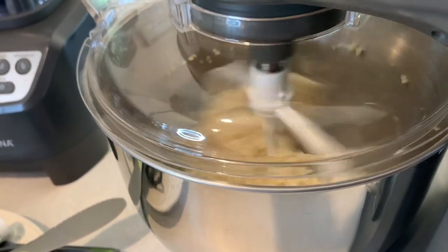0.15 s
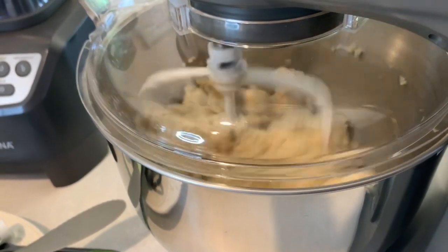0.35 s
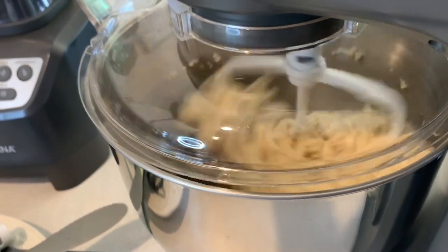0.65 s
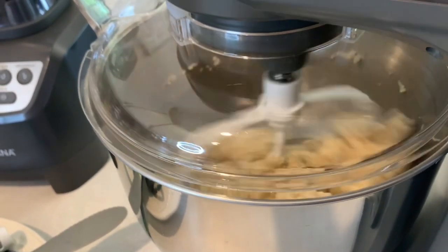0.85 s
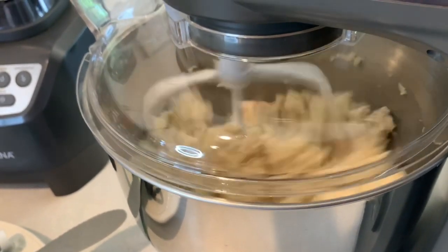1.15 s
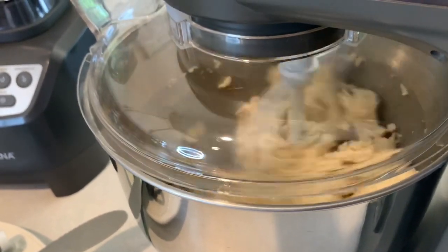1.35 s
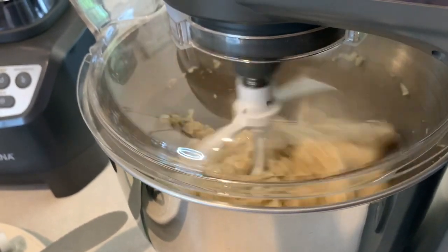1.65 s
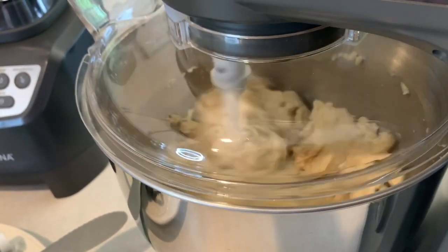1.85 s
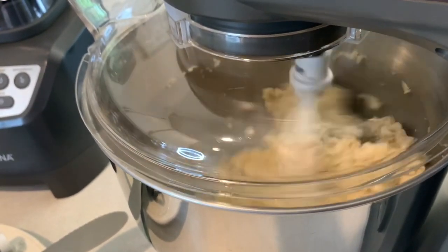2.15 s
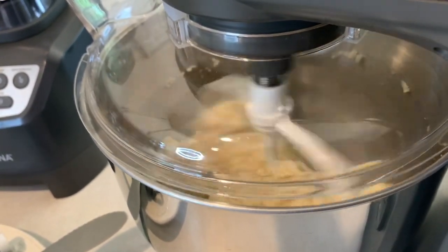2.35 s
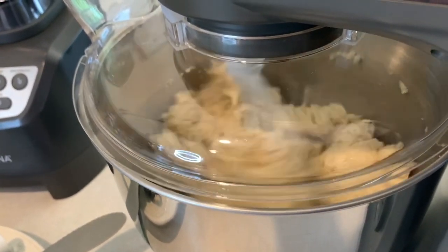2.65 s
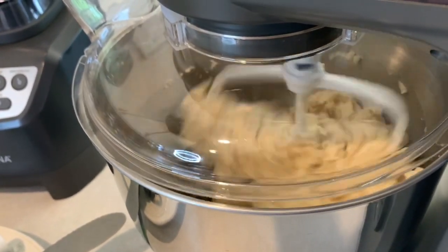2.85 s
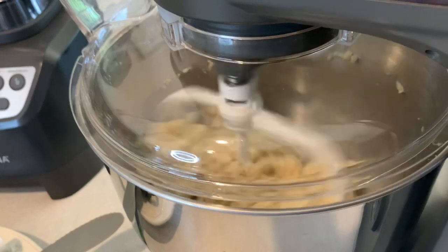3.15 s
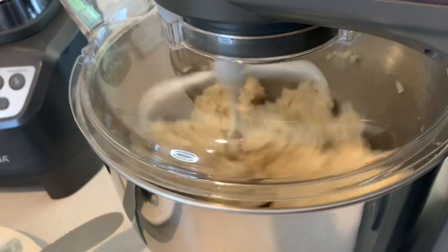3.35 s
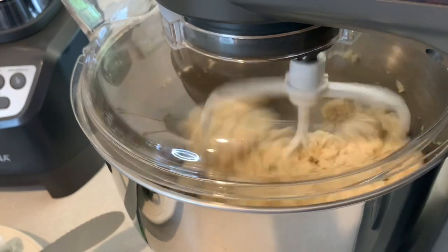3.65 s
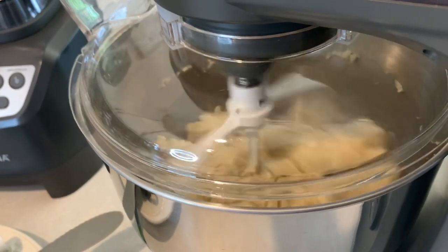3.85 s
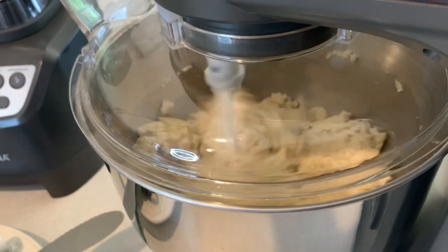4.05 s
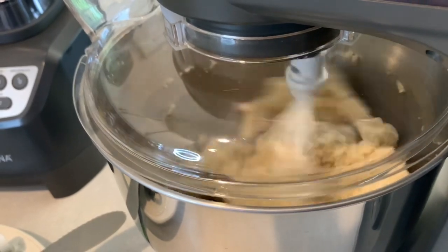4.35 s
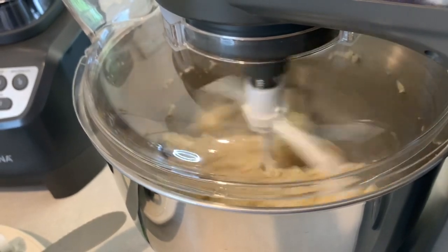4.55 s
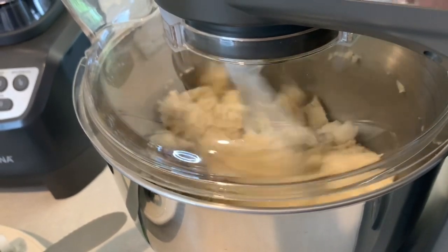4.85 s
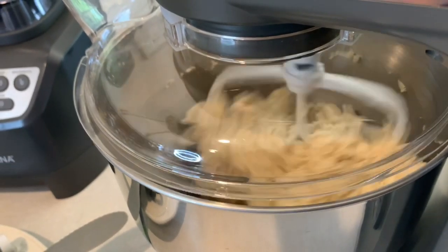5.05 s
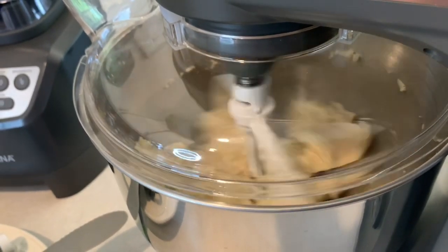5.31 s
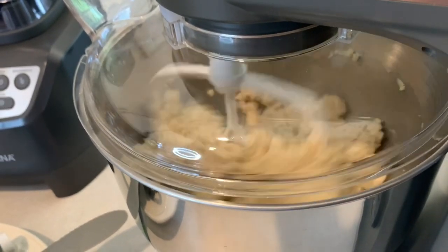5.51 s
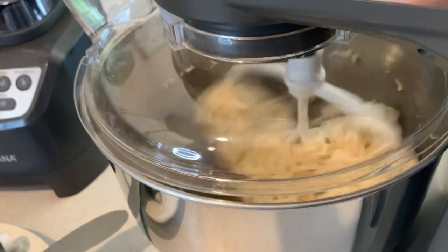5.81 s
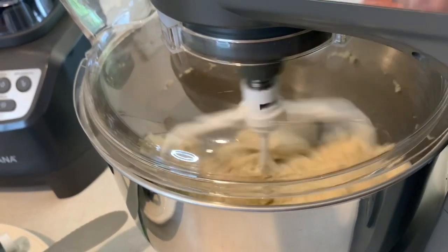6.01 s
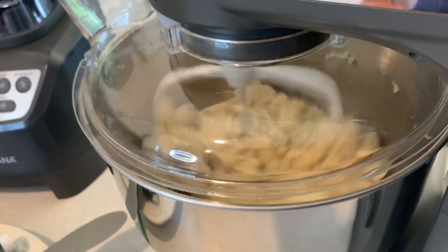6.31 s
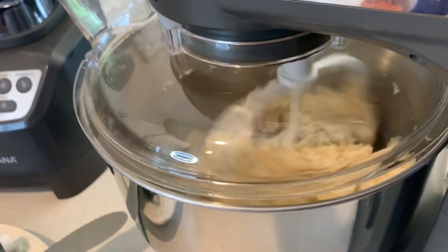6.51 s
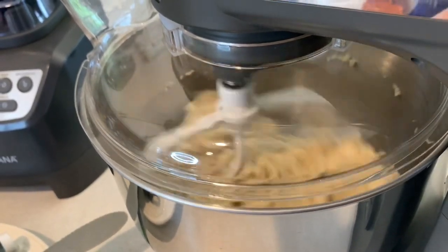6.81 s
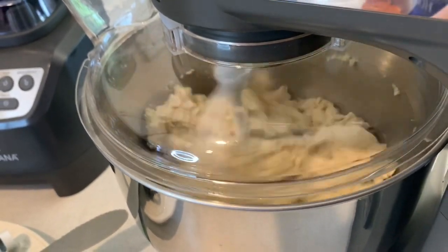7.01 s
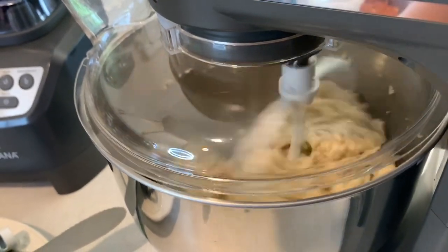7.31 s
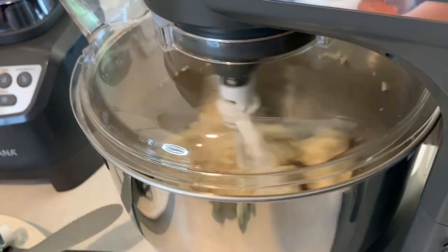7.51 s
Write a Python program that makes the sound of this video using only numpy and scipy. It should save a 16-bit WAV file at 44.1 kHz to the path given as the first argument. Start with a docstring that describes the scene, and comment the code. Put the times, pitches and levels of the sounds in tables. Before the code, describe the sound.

Very close to the microphone, a kitchen stand mixer whirs without a break, mixing a low electric hum, a buzzing rattle and a rhythmically pulsing whine. The gears add a fast, piercing tick and scrape that slightly overloads at the peaks. Dough rumbles and thumps softly against the steel bowl, growing quieter in the second half as it binds, and near the end a nasal gear tone grows stronger.

```python
"""A stand mixer kneading dough

Dough tumbles in a steel bowl, very close to a phone with two microphone ports. The motor hums and
the housing rattles. The gears whine, swelling as the beater circles and sagging as the dough drags.
Rough teeth on the pinion (the small driving gear) tick shrilly in the same pattern on every turn,
and the loudest peaks overload the phone."""
import sys
import numpy as np
from scipy import signal
from scipy.fft import rfft, irfft
from scipy.io import wavfile
from scipy.ndimage import uniform_filter1d

SR = 44100
rng = np.random.default_rng(int(sys.argv[2]) if len(sys.argv) > 2 else 0)


def output_pcm(signal):
    """Save a mono or channel-first signal as 16-bit PCM at the path in sys.argv[1].

    Samples are clipped to [-1, 1] before scaling.
    """
    pcm = np.clip(np.atleast_2d(signal).T, -1, 1) * 32767
    wavfile.write(sys.argv[1], SR, np.round(pcm).astype(np.int16))


N = 338247
T = np.arange(N) / SR
HZ = np.maximum(np.arange(N // 2 + 1) * SR / N, 1)

MAINS_HZ = 60
WHINE_ORDER, SECOND_GEAR_ORDER = 28, 44  # vibrations per turn of the shaft
ORBIT_HZ, BLADE_HZ = 1.361, 6.366  # the beater's trips round the bowl, and its blade strokes

# How the two ports hear a sound. Each row: frequency in Hz, left's lead in radians, likeness (0-1).
MIC_PORTS = [(30, 0.5, 0.4), (100, -0.5, 0.44), (398, -.5, 1), (875, -1, 0.46), (1110, -2, 0.63),
             (1680, -2.5, 0.02), (2060, 0, 0.22), (4100, -1, 0.05), (6170, 1, 0.12), (7100, -1.5, 0.77),
             (7230, -0.9, 0.96), (7660, -2, 0.83), (8163, -2.5, 1), (8310, -3, 0.98), (9530, -3.5, 1),
             (9900, -5, 0.94), (11300, -5, 0.8), (12400, -10.5, 0.8), (14100, -16.5, 0), (15200, -10, 0.3)]
# The rumble of tumbling dough. Each row: frequency in Hz, base level in dB per Hz.
DOUGH_SPECTRUM = [(30, -77), (130, -56.5), (200, -56.5), (275, -52), (330, -61), (450, -68), (1500, -89)]
# Heavy lumps landing. Each row: time in seconds, base thud level in dB, change in the rumble in dB.
LUMPS = [(1.666, -30, -5), (1.87, -36, 4), (2.396, -27, -2), (3.475, -27, -2), (3.688, -26, 3),
         (3.792, -24, 4), (4.0, -27, 1), (5.001, -28, -6), (5.591, -24, 11), (5.741, -19, -3)]
# The motor's magnetic hum. Each row: multiple of the mains rate, level in dB,
# left minus right in dB, left's lead in radians.
HUM_TONES = [(1, -45, -3, .2), (2, -29.5, -3, .1), (4, -43, -4, -1.5), (6, -26.5, 0, -.4), (8, -33, 2, -.4),
             (10, -40.5, -2, -1.6), (12, -44, -5, .5), (14, -33.5, -3, .2), (16, -39, -4, -1.6)]
# Faint tones beside the hum. Each row: pitch in Hz, then level, balance and lead as for the hum.
FAINT_TONES = [(320, -38, -3, -.5), (492, -39, 1, -.7), (625, -42, -1, -2.5)]
# The rush of the motor and its cooling air. Each row: frequency in Hz, base level in dB per Hz.
RUSH_SPECTRUM = [(15, -69), (55, -56), (100, -58), (170, -59.5), (420, -59), (700, -56), (1250, -54.5),
                 (2350, -59), (3300, -56), (4500, -56.5), (5300, -60), (6300, -61), (8000, -68.5)]
# Where housing and bowl ring. Each row: pitch in Hz, width in Hz, boost in dB.
BODY_RESONANCES = [(339.5, 33, 11.5), (491, 53, 9), (867, 75, 7.5), (1010, 110, 7), (1322, 36, 5.5),
                   (1497, 89, 9), (1720, 330, 7.5), (2060, 194, 8), (3126, 150, 1), (3940, 110, 3.5),
                   (6070, 100, 11.5)]
# The drive's speed, heard as the pitch of its whine. Each row: time in seconds, pitch in Hz.
WHINE_PITCH = [(0.08, 1006), (0.31, 1010), (0.62, 1006), (1.27, 1020), (1.39, 1006), (1.67, 1007),
               (1.77, 1017), (2.11, 1007), (2.84, 1008), (3.44, 1007), (4.38, 1009), (4.61, 1017),
               (4.74, 1009), (5.53, 1013), (5.85, 1002), (6.14, 1011), (7.1, 1007), (7.58, 1011)]
# Tones of meshing gears. Each row: multiple of the shaft's rate, base level in dB,
# left minus right in dB, left's lead in radians.
GEAR_TONES = [(11 / 3, -26, -6.5, -0.13), (22 / 3, -42.5, 0, -0.61), (14, -32.5, -0.5, -0.3),
              (24, -35, -1, -0.2), (26, -35.5, 8, -2), (28, -19.5, -3.5, -2.5), (29.5, -31.5, 1.5, -1.5),
              (37.5, -42, 8, 0), (42, -32.5, 10.5, -1.9), (46.5, -36, 4, 0), (143 / 3, -31.5, 0, -2.1),
              (55.5, -41, 2, 4.5), (172 / 3, -36.5, 0, .2), (70, -35.5, 4.5, 1), (82, -36, -3, 3),
              (88, -28.5, 4, -2), (120.5, -39, 9.5, -1), (150.5, -39, 0, -0.5), (253, -32.5, -0.5, 5)]
# How the gear tones swell as the beater circles, one table for each group of tones.
# Each row: swells per orbit, base depth in dB, place of the peak in the swell (0-1).
WHINE_SWELL = [(1, 0.6, 0.54), (2, 2.5, 0.46)]
LOW_GEAR_SWELL = [(1, 3.1, 0.42)]
UPPER_GEAR_SWELL = [(2, 0.85, .95)]
IN_STEP_SWELL = [(1, 3.2, .70)]
OPPOSITE_SWELL = [(1, 4, 0.29), (3, 1.6, 0.99)]
# The second gear sings out when the beater pushes a big lump.
# Each row: time in seconds, half length in seconds, boost in dB.
LUMP_SURGES = [(0.43, 0.073, 7), (1.22, .12, 5), (1.92, 0.064, 6), (4.25, .08, 5), (7.47, 0.14, 6.5)]
# The scrape of the gears. Each row: frequency in Hz, base level in dB per Hz.
SCRAPE_SPECTRUM = [(5000, -93), (5900, -57.5), (6500, -51.5), (6950, -49), (7100, -47.5), (7550, -41.5),
                   (8250, -37.5), (8700, -49), (9300, -70), (9750, -49), (10250, -63), (10700, -56),
                   (12000, -62.5), (13000, -65), (15500, -55)]
# Pitches the gear case favours or muffles. Each row: pitch in Hz, width in Hz, boost or cut in dB.
CASE_RESONANCES = [(7110, 63, 7), (7180, 44, -10.5), (7280, 99, 5.5), (7540, 270, 2.5), (7917, 333, -10),
                   (8160, 48, 6.5), (8490, 88, 5), (8230, 120, -3)]
# Rough spots on the pinion. Each row: place in the turn (0-1), half length in milliseconds,
# ringing pitch in Hz, base level in dB.
ROUGH_TEETH = [(.005, 0.61, 7380, -4.5), (.045, 0.68, 7870, -3), (.10, 0.56, 7190, -9.5),
               (.21, 0.81, 7200, -12.5), (.30, 0.56, 7520, -13.5), (.37, 0.79, 7914, 2),
               (.48, 1.5, 7710, -13.5), (.565, 0.67, 8110, -4), (.63, 0.32, 8400, -7.5),
               (.70, 0.25, 8330, -6.5), (0.774, 0.36, 8270, -1.5), (.845, 0.33, 8300, -8.5),
               (.90, 0.65, 7200, -8), (.955, 0.38, 7880, -0.5)]


def undb(db):
    """Turn decibels into a factor to multiply by."""
    return 10 ** (np.asarray(db) / 20)


def bump(offset, half_width):
    """A smooth hill of height 1, centred where the offset is zero."""
    return np.exp(-.5 * (offset / half_width) ** 2)


def colour(points):
    """Gain at every frequency, drawn through (Hz, dB) points."""
    hz, db = np.transpose(points)
    return undb(np.interp(np.log(HZ), np.log(hz), db))


def resonances(peaks):
    """Gain at every frequency for a body that boosts or cuts certain pitches."""
    return undb(sum(db / (1 + (2 * (HZ - hz) / width) ** 2) for hz, width, db in peaks))


def noise():
    """The spectrum of white noise at 0 dB per Hz."""
    return rfft(rng.standard_normal(N)) * np.sqrt(SR / 2)


def wander(rate):
    """A random drift of about 1 either way that picks a new target `rate` times a second."""
    return 1.2 * np.interp(T * rate, np.arange(4096), rng.standard_normal(4096))


def orbit_swell(rows):
    """A level in dB that rises and falls the same way on every orbit of the beater."""
    return sum(db * np.cos(2 * np.pi * (count * ORBIT_HZ * T - place)) for count, db, place in rows)


def ports(direct, scattered):
    """Both ports hear the direct sound, slightly out of step, and the scattered in opposite signs."""
    hz, lead, likeness = np.transpose(MIC_PORTS)
    lead = np.interp(HZ, hz, lead)
    likeness = np.clip(np.interp(HZ, hz, likeness), 0, 1)
    side = np.array([[1], [-1]])
    heard = direct * np.sqrt((1 + likeness) / 2) + side * scattered * np.sqrt((1 - likeness) / 2)
    return irfft(heard * np.exp(.5j * side * lead), N)


def tone(cycles, db, pan_db, lead, rough, rate):
    """One tone in both ports; vibration shakes its level and phase."""
    shake = 1 + rough * (wander(rate) + 1j * wander(rate))
    wave = np.sqrt(2 / (1 + 2 * rough ** 2)) * undb(db) * shake * np.exp(2j * np.pi * cycles)
    side = np.array([[.5], [-.5]])
    return (wave * undb(side * pan_db) * np.exp(1j * side * lead)).real


def dough(loose_db=2, binds_at_s=3.2, fade_db_per_s=2.6):
    """Soft lumps tumble against the bowl, quieter as they bind; the scattered sound barely fades."""
    lumps_db = sum(db * bump(T - at_s, 0.044) for at_s, _, db in LUMPS)
    fade_db = fade_db_per_s * np.maximum(T - binds_at_s, 0)
    rumble_db = loose_db - fade_db + lumps_db + 1.3 * wander(8)
    direct = ports(colour(DOUGH_SPECTRUM) * noise(), 0) * undb(rumble_db)
    scattered = ports(0, colour(DOUGH_SPECTRUM) * noise()) * undb(7 + 0.086 * rumble_db)
    return direct + scattered


def thuds(gain_db=-5, half_s=0.022, pitch_hz=58):
    """Each falling lump gives the bowl a soft, low push."""
    out = 0
    for at_s, db, _ in LUMPS:
        since = T - at_s - half_s
        swell = undb(db + gain_db) * bump(since, half_s)
        out = out + swell * np.sin(2 * np.pi * (pitch_hz * since + rng.random()))
    return out


def motor():
    """Mains hum and a few faint tones, steady whatever the load."""
    tones = [(multiple * MAINS_HZ, *rest) for multiple, *rest in HUM_TONES] + FAINT_TONES
    return sum(tone(hz * T + rng.random(), db, pan_db, lead, rough=0.13, rate=6)
               for hz, db, pan_db, lead in tones)


def bowl_ripple(depth_db=3.5, spacing_hz=45):
    """The thin steel bowl rings at many close, high pitches: a fine ripple on the spectrum."""
    ripple = np.interp(HZ / spacing_hz, np.arange(2048), rng.standard_normal(2048))
    return undb(depth_db * ripple * np.minimum(HZ / 2300, 1) ** 2)


def clatter(turns, repeat=0.53, flutter_db=1.55, points=1222):
    """The drive's rattle: always new in the bass, partly repeating each turn as a buzz higher up."""
    one_turn = rng.standard_normal(points)
    repeating = np.interp(turns % 1 * points, np.arange(points), one_turn) * (1 + 0.16 * wander(5.5))
    fresh = rng.standard_normal(N) * undb(flutter_db * wander(25))
    share = repeat * np.minimum(HZ / 2300, 1)
    return (share * rfft(repeating) + np.sqrt(1 - share ** 2) * rfft(fresh)) * np.sqrt(SR / 2)


def housing(turns, gear_db, pan_db=-1.5, ring_hz=1600, ring_width_hz=190):
    """The rattle makes housing and bowl ring; pitches near the second gear's swell along with it."""
    shape = colour(RUSH_SPECTRUM) * resonances(BODY_RESONANCES)
    direct, scattered = (shape * bowl_ripple() * clatter(turns) for _ in range(2))
    rattle = ports(direct, scattered)
    near_gear = irfft(rfft(rattle) * bump(HZ - ring_hz, ring_width_hz), N)
    swell = undb(0.17 * (gear_db - gear_db.mean())) - 1
    return (rattle + swell * near_gear) * undb(np.array([[.5], [-.5]]) * pan_db)


def second_gear_levels(sag_hz, stiff_at_s=6.1, strain_db_per_s=3, db_per_sag_hz=1.2):
    """Big lumps, drag and stiffening dough strain the second gear: the levels of its two parts in dB."""
    strain_db = strain_db_per_s * np.maximum(T - stiff_at_s, 0)
    surge_db = sum(db * bump(T - at_s, half_s) for at_s, half_s, db in LUMP_SURGES)
    drag_db = db_per_sag_hz * sag_hz
    in_step_db = -30 + orbit_swell(IN_STEP_SWELL) + strain_db + surge_db + wander(8)
    opposite_db = -24 + orbit_swell(OPPOSITE_SWELL) + strain_db + drag_db + 2.5 * wander(10)
    return in_step_db, opposite_db


def second_gear(turns, in_step_db, opposite_db):
    """A nasal ring that swings round with the beater, reaching the ports in step, then out of step."""
    cycles = SECOND_GEAR_ORDER * turns + rng.random()
    in_step = tone(cycles, in_step_db, -1, 0, rough=0.62, rate=45)
    opposite = tone(cycles, opposite_db, 0, np.pi, rough=0.26, rate=35)
    return in_step + opposite


def whine_boost(sag_hz):
    """Extra dB for the main whine, which swells with each orbit, each blade stroke and the drag."""
    blade = 0.9 * np.cos(2 * np.pi * (BLADE_HZ * T - 0.79))
    load = orbit_swell(WHINE_SWELL) + blade + 0.05 * sag_hz - 0.3 * wander(8)
    return 1.412 + 0.8 * load


def gears(turns, whine_boost_db):
    """Meshing teeth make tones whose pitches all follow the speed of the shaft."""
    out = 0
    for order, db, pan_db, lead in GEAR_TONES:
        if order < 4:  # the lowest tone is clean and beats against the hum
            boost_db, rough, rate = 0, 0.033, 8.5
        elif order < WHINE_ORDER * 2 / 3:  # low tones swell once per orbit
            boost_db, rough, rate = 0.6 + orbit_swell(LOW_GEAR_SWELL), 0.14, 10
        elif order == WHINE_ORDER:  # the loudest tone follows the load
            boost_db, rough, rate = whine_boost_db, 0.15, 40
        else:  # the rest flare and fade
            boost_db = -0.4 + orbit_swell(UPPER_GEAR_SWELL) + 0.7 * wander(5)
            rough, rate = 0.8, 13 + order / 5
        out = out + tone(order * turns + rng.random(), db + boost_db, pan_db, lead, rough, rate)
    return out


def ticks(turns, shaft_hz, scatter_db=2.5, detune=0.013, slop_ms=0.0954):
    """Each rough spot on the pinion rings briefly as it comes round, never quite the same twice."""
    out = 0
    for place, half_ms, ring_hz, db in ROUGH_TEETH:
        turn = np.floor(turns - place + .5).astype(int)
        size, pitch, late, phase = rng.standard_normal((512, 4))[turn + 1].T  # new for each turn
        since = (turns - place - turn) / shaft_hz - late * slop_ms / 1000
        half_s = half_ms / 1000 * (1 + 0.15 * np.sign(since))  # quick rise, slower fall
        swell = undb(db + scatter_db * size) * bump(since, half_s)
        ring = np.sin(2 * np.pi * (ring_hz * (1 + detune * pitch) * since + phase))
        out = out + np.sqrt(2) * swell * ring
    return rfft(out)


def pinion(turns, shaft_hz, tick_db=0.8, unsteady_db=1.5, rise_db_per_s=0.09):
    """Ticks and an unsteady scrape sound through the gear case, harder as the dough stiffens."""
    force_db = -0.5 + rise_db_per_s * (T - T.mean()) + 0.12 * wander(8)
    unsteady = undb(unsteady_db * (wander(6.5) + wander(30)) / np.sqrt(2))
    paths = []
    for _ in range(2):  # the direct sound, then the scattered sound
        ticking = undb(tick_db) * ticks(turns, shaft_hz)
        scrape = colour(SCRAPE_SPECTRUM) * rfft(unsteady * irfft(noise(), N))
        paths.append(resonances(CASE_RESONANCES) * (ticking + scrape))
    return ports(*paths) * undb(force_db)


def scene():
    """One shaft drives the rattle, gear tones and ticks together, over the dough and the hum."""
    whine_hz = np.interp(T, *np.transpose(WHINE_PITCH))
    shaft_hz = whine_hz / WHINE_ORDER
    turns = np.cumsum(shaft_hz) / SR
    sag_hz = whine_hz.mean() - whine_hz  # how far the dough drags the pitch down
    in_step_db, opposite_db = second_gear_levels(sag_hz)
    background = dough() + thuds() + motor() + housing(turns, in_step_db)
    whine = second_gear(turns, in_step_db, opposite_db) + gears(turns, whine_boost(sag_hz))
    return background + whine + pinion(turns, shaft_hz)


def record(dry, gain_db=1.66, knee=1.13, top_hz=15700):
    """The phone squeezes the loudest ticks and cuts the highest treble; the peaks still clip."""
    loud = dry * undb(gain_db)
    envelope = np.sqrt(2 * np.abs(uniform_filter1d(loud ** 2, size=24, axis=1)))
    squeezed = loud / (1 + (envelope / knee) ** 4) ** (1 / 4)
    lowpass = signal.ellip(12, .1, 70, top_hz, fs=SR, output="sos")
    return np.clip(signal.sosfilt(lowpass, squeezed), -1, 1)


dry = scene()
out = record(dry)
output_pcm(out)
```